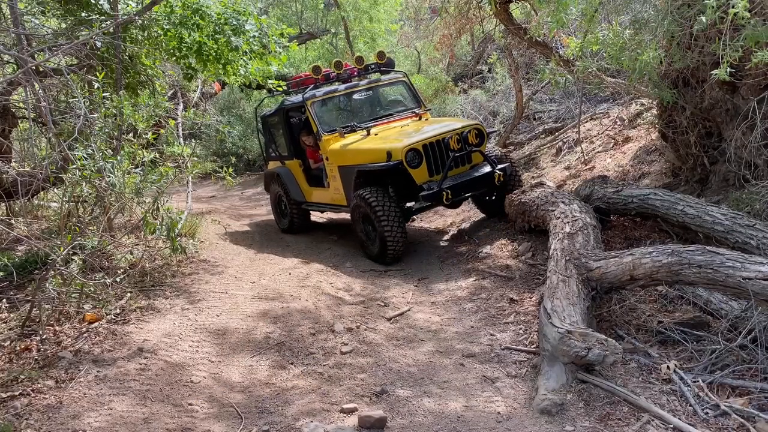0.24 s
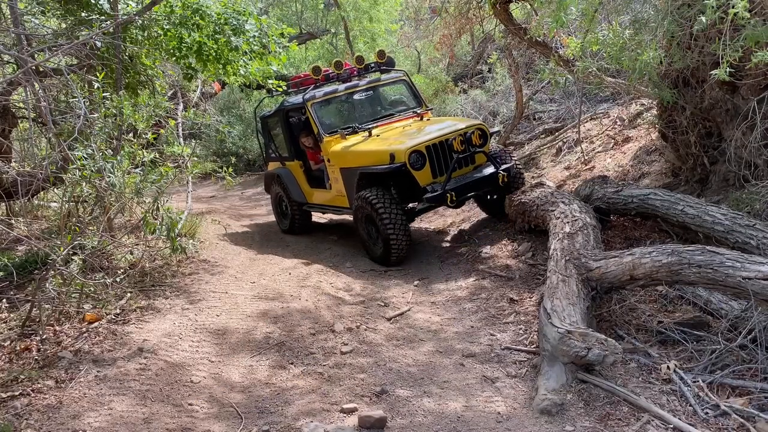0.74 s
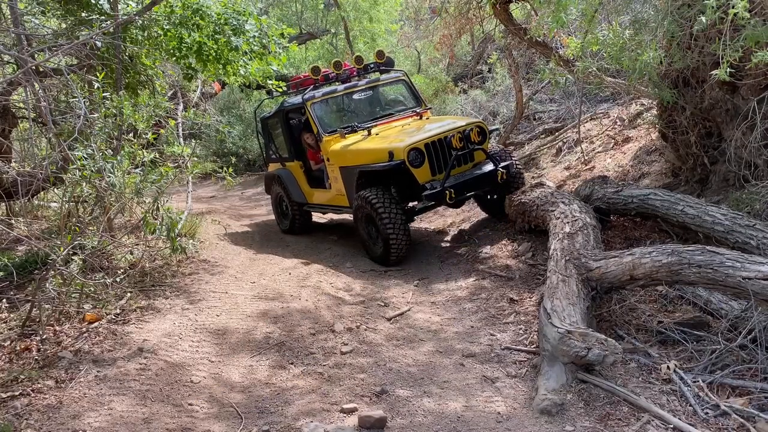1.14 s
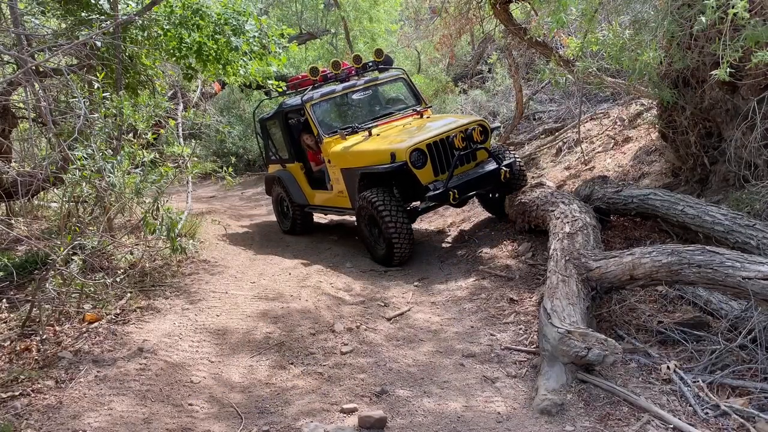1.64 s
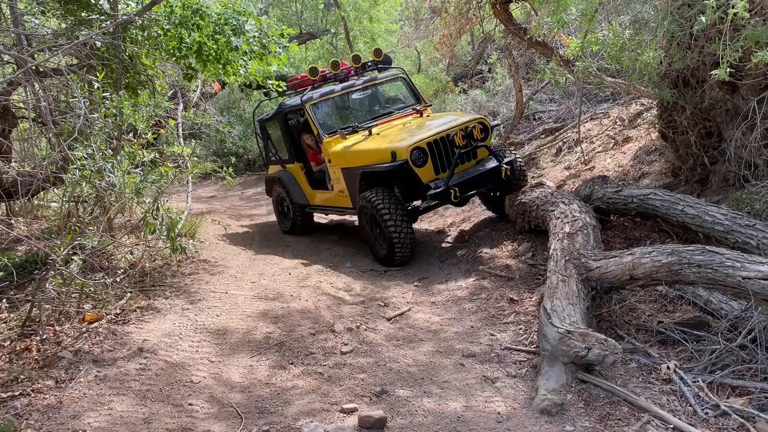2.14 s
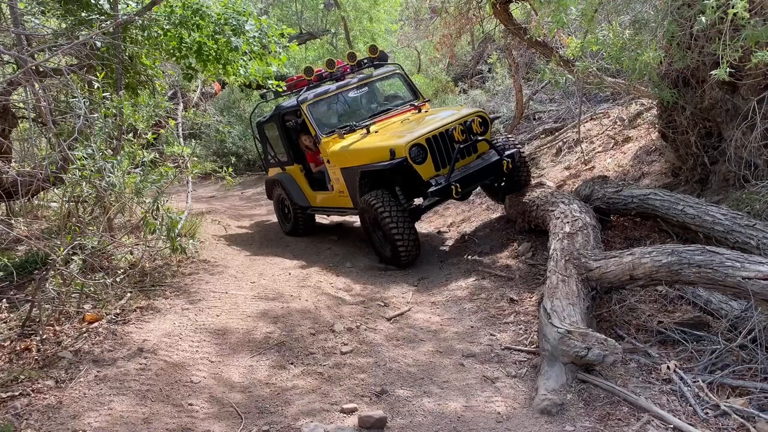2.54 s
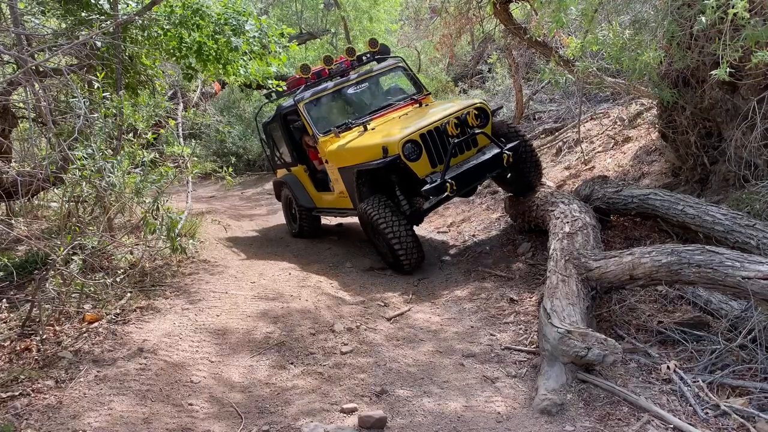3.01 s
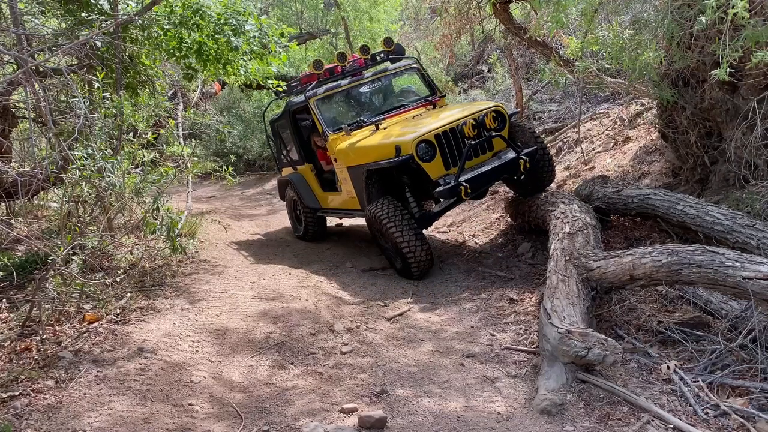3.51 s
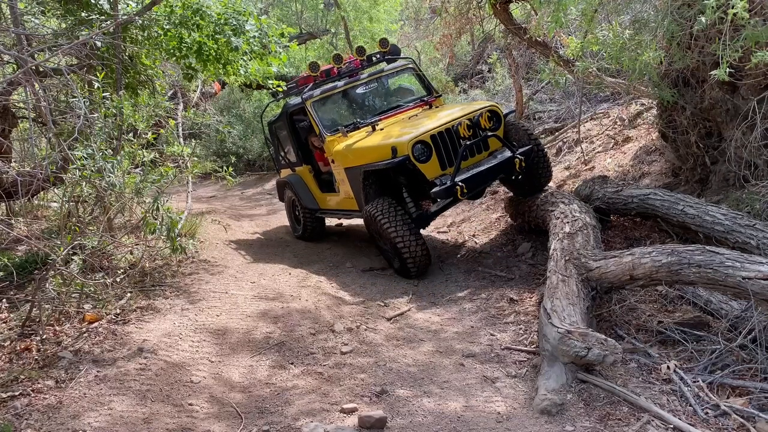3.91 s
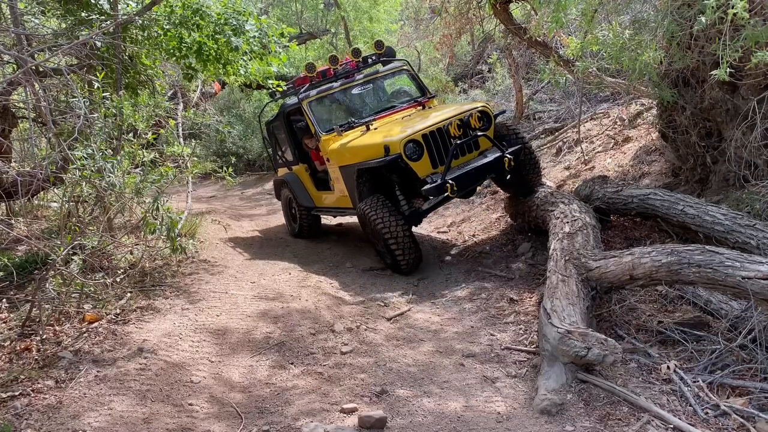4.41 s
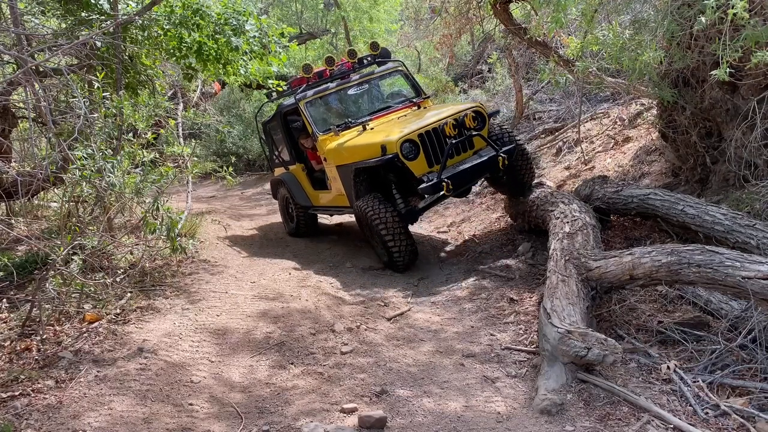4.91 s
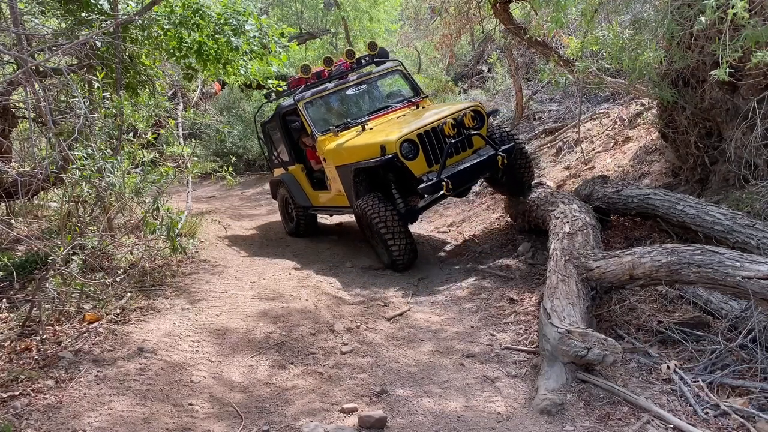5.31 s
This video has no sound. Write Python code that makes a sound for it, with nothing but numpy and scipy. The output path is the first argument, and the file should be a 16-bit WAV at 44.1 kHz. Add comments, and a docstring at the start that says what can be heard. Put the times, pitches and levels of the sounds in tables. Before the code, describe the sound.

A four-cylinder off-roader climbs a log on a dirt trail, heard outdoors from a few metres in dry, slightly diffuse stereo. It starts in a low lug and swells within half a second to a steady, booming, low-rev pull. Airy fan noise and fine valve rattle sit above, and thin steering-pump whine comes and goes until 2.2 s, squealing faintly near 0.9. A twig ticks at 0.7; dull knocks cluster around 1.65-1.85. Scraping tread swells at 1.6 and 2.1, with a flurry of bark and twig snaps from 1.97 to 2.22 and short rising rubber groans at 2.1 and 2.3. After 2.4 the exhaust lets go, slowing to a weak burble near stalling by 3.6, with a soft scrape at 2.8 and a thumping pop at 3.4. Revs jump at 3.7, growl higher until 4.9, then fall; another low pop comes at 5.2, small knocks at 5.4-5.5.

```python
"""Off-roader climbing a log

A four-cylinder off-roader crawls up a log on a dirt trail among bushes: the exhaust is a stack of firing orders
that booms in the pull, lugs, burbles and pops off throttle, and swells in one short rev. Fan noise and valve
taps rattle above it, and the steering pump whines in harmonics of its pulsing while the wheels are turned. The
tyre scrapes (noise), groans (stick-slip tone) and cracks bark and twigs (bursts); short dull taps are knocks."""
import sys
import numpy as np
from scipy import signal
from scipy.fft import rfft, irfft
from scipy.io import wavfile
from scipy.ndimage import uniform_filter1d

SR = 44100
rng = np.random.default_rng(int(sys.argv[2]) if len(sys.argv) > 2 else 0)


def store_wav(level_fs):
    """Save 16-bit WAV to argv[1]."""
    pcm = np.round(np.clip(np.atleast_2d(level_fs), -1, 1) * 32767)
    wavfile.write(sys.argv[1], SR, pcm.T.astype(np.int16))


N = 244755

# Levels of sources are those of the direct sound, before scattering and the microphone.
# engine speed, a slow pull, a sag almost to stalling, one rev: (time [s], firing rate [Hz])
SPEED = [(0, 54.8), (.13, 56.5), (.26, 64), (.46, 70), (.68, 71.1), (1.35, 65.6), (1.9, 66.9), (2.24, 72.6),
         (2.7, 66.6), (3.6, 52.4), (3.87, 95.5), (4.17, 109.8), (4.42, 111.4), (4.68, 115.8), (4.89, 114.5),
         (5.16, 90), (5.4, 78.4), (5.55, 77.6)]
# engine load, as the rms level of the firing tone: (time [s], level [dB])
LOAD = [(0, -31), (.2, -17.5), (.4, -10), (1.3, -11.5), (2.25, -9.5), (2.43, -14), (2.6, -30), (3.3, -44),
        (3.55, -42), (3.66, -10), (3.74, -7), (3.9, -11.5), (4.38, -15.5), (4.55, -12.7), (4.8, -13.5),
        (4.93, -25.5), (5.2, -22.5), (5.55, -31)]
# reference firing rate in a crawl, and firing-tone level in a steady pull
CRAWL_HZ, PULL_DB = 68, -10
# low orders of the exhaust in a steady pull, before the silencer:
# (multiple of firing rate [1], level [dB], change with load [dB/dB])
LOW_ORDERS = [(1.5, -26.5, 0.45), (2, -22, 0.29), (3, -45.5, 0.5)]
# what the silencer passes of the low orders: (frequency [Hz], gain [dB])
SILENCER = [(80, 14.5), (105, 0.5), (120, -3.5), (140, -0.5), (156, 1), (172, -6.5), (200, -2.5),
            (232, -13), (270, 9.5), (340, -17)]
# lugging near stalling with uneven firings:
# (start [s], length [s], level of 1.5th order [dB], level of 3rd order before bark [dB])
LUGS = [(0, 0.233, -19.5, -36.5), (3.404, .22, -20.5, -28)]
LUG_ATTACK_S, LUG_RELEASE_S = 0.038, 0.032
# growl under load: (multiple of firing rate [1], level relative to the firing tone at 110 Hz firing rate,
# before tailpipe lift and bark [dB])
GROWL = [(2.5, -29), (3.5, -30), (4, -35), (4.5, -39), (5, -34.5), (6, -36)]
# upper tailpipe resonances that the growl sweeps through: (frequency [Hz], half width [Hz], lift [dB])
TAILPIPE_PEAKS = [(263, 10, 7), (455, 21, 3.5), (580, 35, -2)]
# harder firings while the revs climb: greatest lift, and the climb [octaves/s] that gives three quarters of it
BARK_DB, BARK_OCT_PER_S = 5, 3.3
# burble of unequal firings: level at crawl and steady pull, dB per octave of speed, dB per dB of load
BURBLE_DB, BURBLE_DB_PER_OCT, BURBLE_PER_LOAD = -30.5, 7, -0.13
# silencer and tailpipe resonances of the burble: (frequency [Hz], width [Hz], relative level [dB])
PIPE = [(80.4, 32, 0.5), (125, 32, 1.5), (192, 230, -11)]
# exhaust pops as the throttle moves: (time [s], peak level [dB], pitch [Hz])
POPS = [(2.855, -28, 198), (3.374, -10.5, 79.3), (5.196, -13, 74)]
POP_SWELL_S = .0105  # time constant; the envelope is highest after two of them
# fan and engine bay against speed: (firing rate [Hz], level [dB])
BAY_LEVEL = [(53, -41), (60, -41), (68, -38), (88, -36), (115, -34)]
BAY_DB_PER_S = 0.4541  # the bay grows louder as the nose comes nearer and lifts
# rush of the fan: (frequency [Hz], relative spectral level [dB per Hz])
FAN = [(120, -6.5), (210, -19), (275, 6), (370, 0), (700, 0), (1000, -3.5), (1550, -8), (2000, -10),
       (2350, -14), (3200, -15), (3700, -23), (7000, -29), (9700, -26), (11500, -34.5), (15000, -48)]
# lift of the fan's treble at crawling speed, and its rise per octave of speed
TREBLE_DB, TREBLE_DB_PER_OCT = 2.5, 1
# ringing of block and manifold: (frequency [Hz], width [Hz], relative level [dB])
BLOCK = [(477, 6.2, 7.5), (578, 22, 5.5), (798, 53, -10), (1129, 170, -8), (1735, 27, -5.5),
         (1878, 44, -11.5), (3096, 17, -17.5)]
PULLEY = 4.187  # pulses of the belt-driven pump per firing
# partials of the pump before its housing, the 7th its squeal: (multiple of pulsing rate [1], relative level [dB])
PUMP = [(2, 0), (3, -2.5), (5, -1.5), (6, -20), (7, -4), (8, -20), (12, -21), (15, -27), (17, -29),
        (18, -28), (19, -27)]
# turns of the steering wheel: (start [s], length [s], level of whine [dB], level of squeal [dB]),
# each the rms level of a partial listed at 0 dB
TURNS = [(.26, .05, -45.5, -60), (.48, .38, -44.5, -54), (.92, .1, -42.5, -41), (1.2, .06, -48, -46),
         (1.36, .16, -43.5, -53), (1.56, .14, -55, -45), (2.13, .07, -45, -53)]
TURN_ATTACK_S, TURN_RELEASE_S = .05, .08
# resonances added by the pump's housing: (frequency [Hz], width [Hz], level relative to unfiltered whine [dB])
HOUSING = [(3530, 120, -6), (5010, 90, 6), (5330, 120, 0)]
# the tread scraping over the log: (time of height [s], half length [s], level [dB])
SCRAPES = [(1.6, 0.34, -35), (2.12, 0.21, -33), (2.78, 0.38, -37)]
# colour of a scrape: (frequency [Hz], relative spectral level [dB per Hz])
SCRAPE_COLOUR = [(150, -23.5), (280, 7.5), (370, -1), (480, 4.5), (750, 1), (1100, -5), (1500, -6),
                 (3000, -19.5), (6000, -30), (15000, -54)]
# the tyre crushing bark and grit: (time of height [s], half length [s], level [dB])
CRUSHES = [(.85, .2, -48), (2.075, 0.03, -41.5), (2.17, .06, -43.5), (2.48, 0.049, -46.5)]
# twigs and bark snapping: (time [s], peak level [dB], gain of middle relative to treble [dB])
SNAPS = [(0.7322, -34, 6), (1.9709, -34, 9), (2.0228, -26, 25), (2.0517, -29, 9), (2.0787, -24, 12),
         (2.126, -26.5, 15), (2.16, -34, -2), (2.1812, -29, 15), (2.2184, -25, 13), (2.4704, -28, 6),
         (3.1715, -42, 8)]
# rubber groaning on the log: (start [s], length [s], pitch at start [Hz], peak level before its wander [dB])
GROANS = [(2.09, .05, 600, -39), (2.28, .06, 640, -35)]
GROAN_RISE_HZ, GROAN_ATTACK_S, GROAN_RELEASE_S = 80, 0.016, 0.043
# knocks of stones and suspension: (time [s], peak level [dB], pitch [Hz])
KNOCKS = [(0.1866, -25.5, 770), (1.167, -30, 1101), (1.649, -27.5, 1410), (1.7472, -26, 1850),
          (1.7694, -21.5, 1110), (1.8306, -27, 1500), (2.539, -26, 1295), (4.833, -25, 805),
          (5.382, -24, 1682), (5.42, -25, 665), (5.491, -26.5, 1052)]
KNOCK_DECAY_S = .0022
# sound scattered by bank and bushes: (frequency [Hz], level relative to direct sound [dB])
DIFFUSE = [(60, -34), (170, -25), (350, -19.5), (700, -14.5), (2800, -13.5), (5000, -8.5), (9000, -13),
           (14000, -13)]
# phase between the two microphone ports: (frequency [Hz], lead of left port [rad])
PORT_PHASE = [(60, 0), (400, -.03), (1640, -.3), (3100, .35), (6720, -.2), (7410, -1.7), (9730, -6.1),
              (12300, -9.7), (15200, -15.3)]
TOP_HZ = 15300  # upper limit of the microphone channel


def exhaust(phase, hz):
    """Periodic excitation: steady firings give a clean stack of orders; unequal ones burble in the pipe."""
    fire_db, = curves(LOAD)
    odd_db, second_db, third_db = low_orders(hz, fire_db)
    burble_db = BURBLE_DB + BURBLE_DB_PER_OCT * np.log2(hz / CRAWL_HZ)
    burble_db = burble_db + BURBLE_PER_LOAD * (fire_db - PULL_DB)
    speed_db = 20 * np.log10(hz / 110)
    bark_db = acceleration_bark(hz)
    # the half order has a floor tied to the burble that rises steeply with speed
    crank_db = np.maximum(fire_db - 34.5, burble_db - 14.5 + 4 * speed_db)
    orders = [(.5, crank_db), (1, fire_db), (1.5, odd_db), (2, second_db + bark_db / 2), (3, third_db + bark_db)]
    for k, db in GROWL:
        growl_db = fire_db + db + 2.02 * speed_db + growl_lift(k * hz) + bark_db
        orders.append((k, growl_db))
    tone = 0
    for k, db in orders:
        # the silencer holds the higher orders back, which rounds off each puff
        lag = np.pi / 2 * (k - 1) ** 2
        tone = tone - np.sqrt(2) * undb(db) * np.cos(2 * np.pi * k * phase - lag)
    return tone + undb(burble_db) * burble(phase)


def burble(phase):
    """Resonance under irregular excitation: impulses of random sign and size ring the pipe, held at an even level."""
    uneven = strokes(2 * phase, 2.8) * np.sign(noise())
    band = 1 / (1 + (45 / bins()) ** 6) / (1 + (bins() / 250) ** 6)
    ringing = through(uneven, resonances(PIPE) * band)
    return ringing / np.sqrt(uniform_filter1d(ringing ** 2, SR // 8) + 1e-12)


def low_orders(hz, fire_db):
    """Source and filter: each low order follows the load and slides along the silencer; lugging resets two."""
    at_hz, pass_db = np.transpose(SILENCER)
    levels = []
    for k, db, share in LOW_ORDERS:
        levels.append(db + share * (fire_db - PULL_DB) + np.interp(k * hz, at_hz, pass_db))
    odd, second, third = levels
    for s, length_s, odd_db, third_db in LUGS:
        lug = gate(s, length_s, LUG_ATTACK_S, LUG_RELEASE_S)
        odd = odd + lug * (odd_db - odd)
        third = third + lug * (third_db - third)
    return odd, second, third


def growl_lift(hz):
    """Resonance: the decibels by which an order changes as it passes the tailpipe's upper modes."""
    return sum(db / (1 + ((hz - centre) / half_width) ** 2) for centre, half_width, db in TAILPIPE_PEAKS)


def acceleration_bark(hz):
    """Saturating excitation: the decibels that the upper orders gain while the engine speeds up."""
    climb = uniform_filter1d(np.gradient(np.log2(hz)) * SR, SR // 10)
    return BARK_DB * np.tanh(np.maximum(climb, 0) / BARK_OCT_PER_S)


def pops():
    """Transient oscillation: a late burn thumps the pipe for a few cycles."""
    out = 0
    for s, db, hz in POPS:
        t = np.maximum(np.arange(N) / SR - s, 0)
        envelope = t ** 2 * np.exp(-t / POP_SWELL_S)
        out = out + peak(envelope * np.sin(2 * np.pi * hz * t), db)
    return out


def engine_bay(phase, hz):
    """Aerodynamic noise with structural ringing: fan and block, both rising with speed."""
    bay_db = np.interp(hz, *np.transpose(BAY_LEVEL)) + BAY_DB_PER_S * np.arange(N) / SR
    return undb(bay_db) * (fan(phase, hz) + undb(-4.5) * block_ringing(phase))


def fan(phase, hz, pulse_depth=0.02, flicker_db=0.7):
    """Modulated broadband noise: the rush throbs with the firings, and its treble rises with speed."""
    throb = 1 + pulse_depth * np.cos(2 * np.pi * phase)
    flicker = undb(flicker_db * walk(39))
    rush = unit(through(noise() * throb * flicker, undb(shape(FAN))))
    treble = through(rush, 1 / (1 + (3600 / bins()) ** 4))
    treble_db = TREBLE_DB + TREBLE_DB_PER_OCT * np.log2(hz / CRAWL_HZ)
    return rush - treble + treble * undb(treble_db)


def block_ringing(phase):
    """Forced vibration: taps of valves and pistons and the belt drive's hum excite the modes of the block."""
    taps = strokes(2 * phase + 0.037 * walk(100), 1.45)
    # each tap is a short rattle of many contacts
    t = np.arange(SR // 30) / SR
    rattle = signal.fftconvolve(taps, np.exp(-t / 0.0082))[:N] * noise()
    # the hum blooms whenever it passes through a resonance
    belt = np.sin(2 * np.pi * PULLEY * phase) + 0.76 * np.sin(2 * np.pi * 5 * phase)
    block = unit(through(unit(rattle) + undb(-40) * belt, resonances(BLOCK)))
    # the ringing keeps an even share of the bay's sound at any speed
    return block / np.sqrt(uniform_filter1d(block ** 2, SR // 3))


def steering_pump(phase, waver_db=1.6):
    """Harmonic series locked to the engine: the pump whines in each turn; its housing colours the top partials."""
    turn = PULLEY * phase + .005 * walk(9)
    low = shrill = 0
    for s, length_s, low_db, shrill_db in TURNS:
        effort = gate(s, length_s, TURN_ATTACK_S, TURN_RELEASE_S)
        low = np.maximum(low, undb(low_db) * effort)
        shrill = np.maximum(shrill, undb(shrill_db) * effort)
    whine = 0
    for k, db in PUMP:
        load = shrill if k == 7 else low
        waver = waver_db * walk(4.4)
        whine = whine + load * undb(db + waver) * np.sin(2 * np.pi * k * turn)
    return np.sqrt(2) * through(whine, 1 + resonances(HOUSING))


def tyre():
    """Contact noise: the sum of crumbling bark, scraping tread and snapping twigs."""
    return crushing() + scraping() + snapping()


def crushing(grains_per_s=2600):
    """Random impulse process: bark and grit crumble in tiny grains."""
    grains = (rng.random(N) < grains_per_s / SR) * noise()
    # (frequency [Hz], relative gain [dB])
    colour = shape([(300, -1), (800, 20), (1500, 2.5), (4000, 4.5), (7000, 3), (10000, 4), (15000, -24)])
    return unit(through(grains, undb(colour))) * swells(CRUSHES)


def scraping(judder_db=1.0):
    """Friction noise: the tread's coloured hiss judders in level."""
    rough = noise() * undb(judder_db * walk(68))
    return unit(through(rough, undb(shape(SCRAPE_COLOUR)))) * swells(SCRAPES)


def snapping():
    """Brittle fracture: each snap is a dying noise burst in a middle and a treble resonance."""
    out = 0
    for s, db, middle_db in SNAPS:
        colour = resonance(7500, 6000) + undb(middle_db) * resonance(2200, 1700)
        out = out + peak(through(burst(s, 0.0054), colour), db)
    return out


def groans():
    """Stick-slip friction: the rubber catches on the log, roughly, rising in pitch each time."""
    t = np.arange(N) / SR
    out = 0
    for s, length_s, hz, db in GROANS:
        jitter = 1 + .07 * walk(80)
        pitch = (hz + GROAN_RISE_HZ * np.clip((t - s) / length_s, 0, 1)) * jitter
        envelope = gate(s, length_s, GROAN_ATTACK_S, GROAN_RELEASE_S) * undb(db + 2 * walk(40))
        out = out + envelope * np.sin(2 * np.pi * np.cumsum(pitch) / SR)
    return out


def knocks(width_share=0.69):
    """Damped impact: short dull knocks from under the chassis, a ringing tap inside a little grit."""
    t = np.arange(N) / SR
    out = 0
    for s, db, hz in KNOCKS:
        age = np.maximum(t - s, 0)
        ring = np.exp(-age / KNOCK_DECAY_S) * np.sin(2 * np.pi * hz * age)
        grit = peak(through(burst(s, KNOCK_DECAY_S), resonance(hz, width_share * hz) ** 2), 0)
        out = out + peak(grit + ring / 2, db)
    return out


def scattered(direct):
    """Diffuse scattering: bank and bushes return the sound late, smeared by a dying noise response."""
    scatter = rfft(burst(0.014, 0.012))
    rms_gain = np.sqrt(np.mean(np.abs(scatter) ** 2))
    return through(direct, scatter / rms_gain * undb(shape(DIFFUSE)))


def undb(db):
    """Logarithmic level: decibels to gain."""
    return 10 ** (np.asarray(db) / 20)


def unit(x):
    """Normalisation: scale to rms 1."""
    return x / np.sqrt(np.mean(x ** 2) + 1e-18)


def peak(x, db):
    """Normalisation: scale to a peak level."""
    return x * undb(db) / np.max(np.abs(x))


def curves(table):
    """Linear interpolation: the columns of a table, joined by straight lines in time."""
    s, *columns = np.transpose(table)
    return [np.interp(np.arange(N) / SR, s, c) for c in columns]


def bins():
    """Discrete spectrum: its frequencies in Hz, at least 1."""
    return np.maximum(np.arange(N // 2 + 1) * SR / N, 1)


def shape(points):
    """Spectral envelope: (Hz, value) points joined on a log-frequency axis."""
    hz, value = np.transpose(points)
    return np.interp(np.log(bins()), np.log(hz), value)


def through(x, response):
    """Linear filtering: multiply the spectrum by a frequency response."""
    return irfft(rfft(x) * response, N)


def resonance(hz, width):
    """Damped oscillator: response of one resonance, gain 1 at its centre."""
    return 1 / (1 + 1j * (bins() ** 2 - hz ** 2) / (bins() * width))


def resonances(table):
    """Modal superposition: the sum of damped resonances (Hz, width Hz, dB)."""
    return sum(undb(db) * resonance(centre, width) for centre, width, db in table)


def noise():
    """Random process: white noise."""
    return rng.standard_normal(N)


def walk(rate):
    """Low-passed noise: smooth random wander up to about rate in Hz, with spread 1."""
    return unit(through(noise(), 1 / (1 + (bins() / rate) ** 4)))


def strokes(phase, scatter_db):
    """Pulse train: one impulse at each whole turn of the phase, each of its own size."""
    turns = np.diff(np.floor(phase), prepend=np.floor(phase[0]))
    return turns * undb(scatter_db * noise())


def burst(s, decay_s):
    """Exponential decay: a crack of noise that starts at s and dies away."""
    t = np.arange(N) / SR - s
    return (t >= 0) * np.exp(-np.abs(t) / decay_s) * noise()


def gate(start_s, length_s, attack_s, release_s):
    """Gaussian-edged envelope: swells up to the start, holds, and dies away."""
    t = np.arange(N) / SR - start_s
    return np.exp(-(np.minimum(t, 0) / attack_s) ** 2 - (np.maximum(t - length_s, 0) / release_s) ** 2)


def swells(table):
    """Superposition: the summed envelope of bell-shaped swells."""
    return sum(undb(db) * gate(s, 0, half_s, half_s) for s, half_s, db in table)


def scene():
    """Two-port reception: direct sound in both, scattered sound in opposite sign, with a phase between ports."""
    hz, = curves(SPEED)
    phase = np.cumsum(hz) / SR + .5  # in firings
    direct = exhaust(phase, hz) + pops() + engine_bay(phase, hz) + steering_pump(phase)
    direct = direct + tyre() + groans() + knocks()
    side = scattered(direct)
    lead = np.exp(.5j * shape(PORT_PHASE))
    return np.array([through(direct + side, lead), through(direct - side, 1 / lead)])


def record(dry):
    """Band limitation: the microphone has a narrow dip in the treble, and the top is cut."""
    colour = 1 - .8 * resonance(8480, 800)
    heard = np.array([through(channel, colour) for channel in dry])
    return signal.sosfilt(signal.ellip(8, .2, 70, TOP_HZ, fs=SR, output="sos"), heard)


dry = scene()
out = record(dry)
store_wav(out)
```